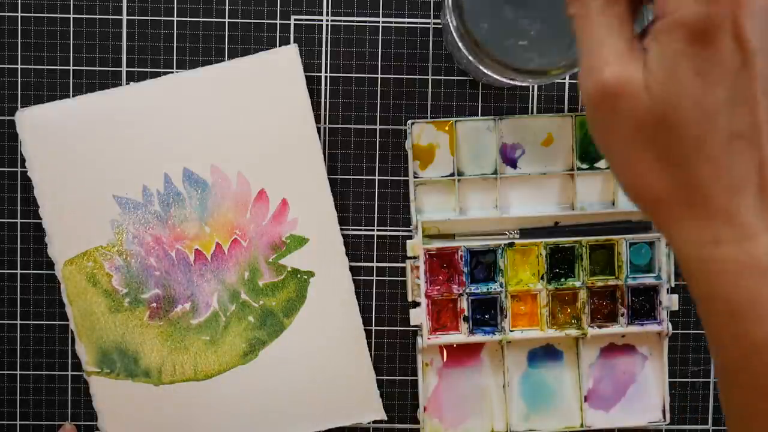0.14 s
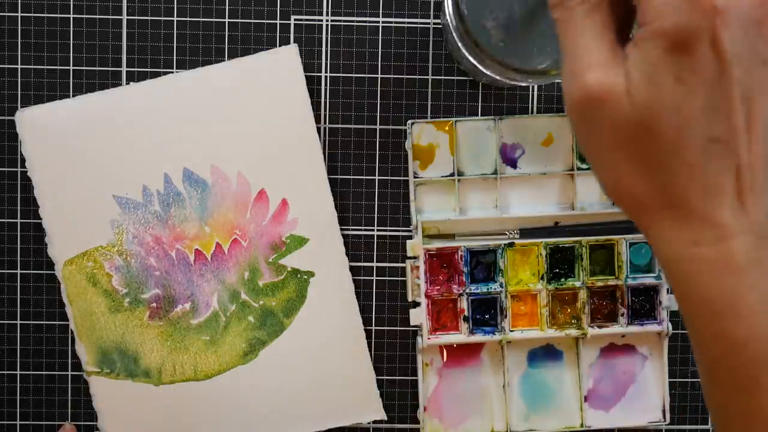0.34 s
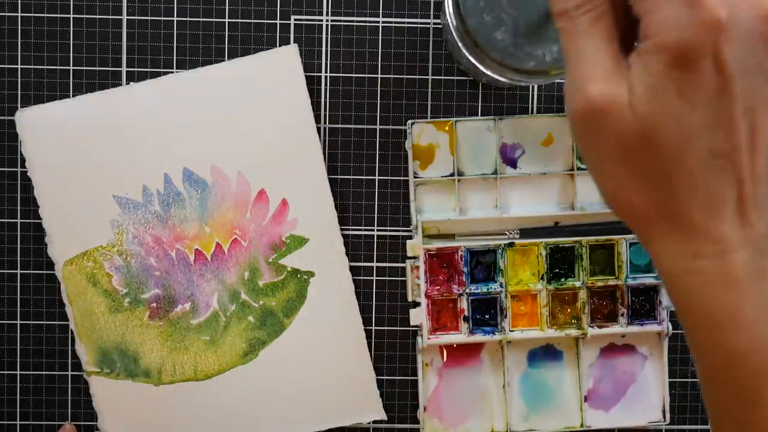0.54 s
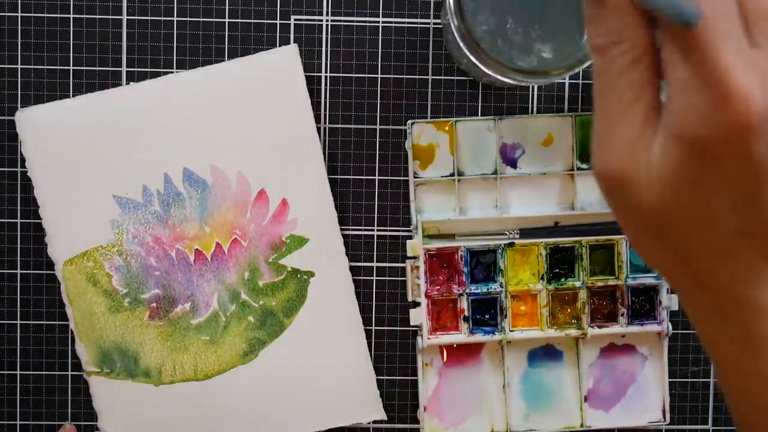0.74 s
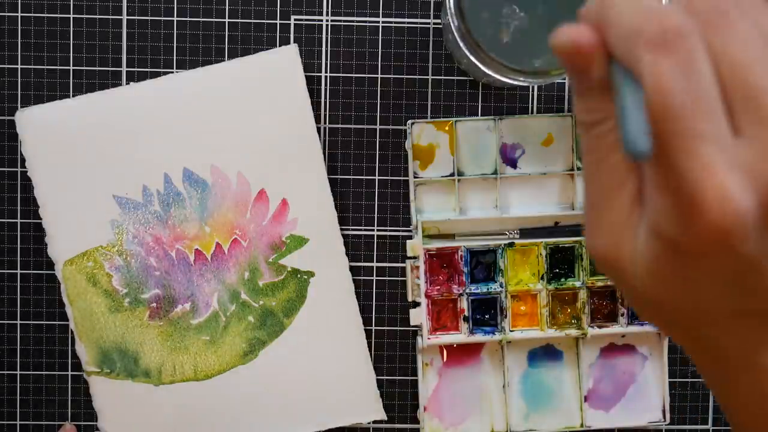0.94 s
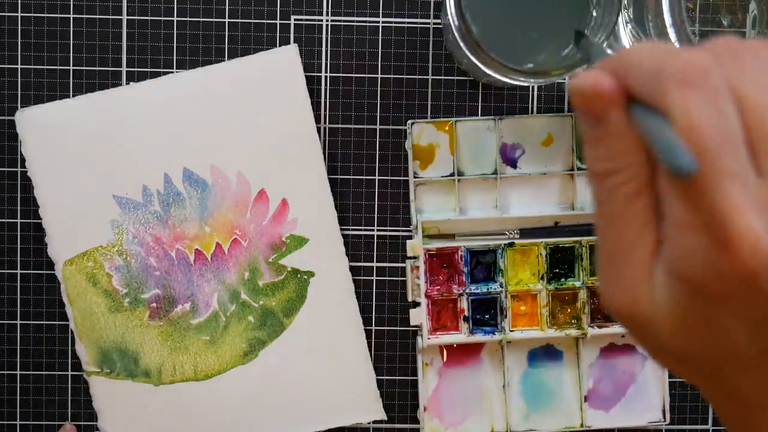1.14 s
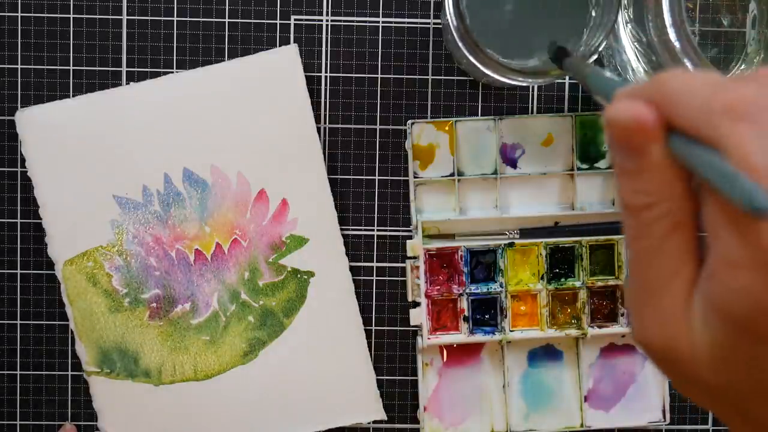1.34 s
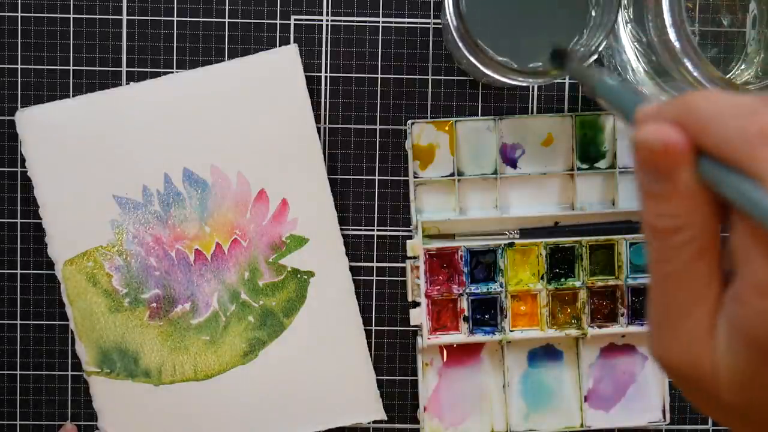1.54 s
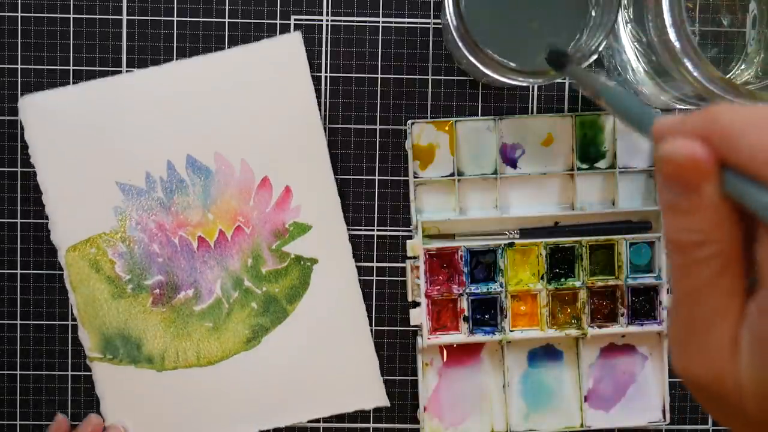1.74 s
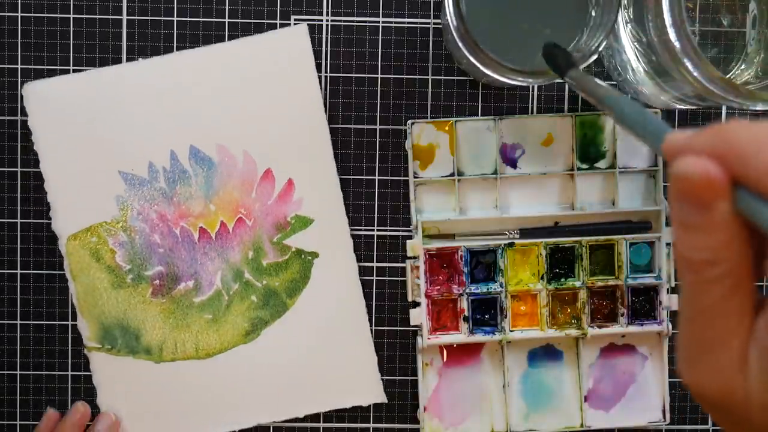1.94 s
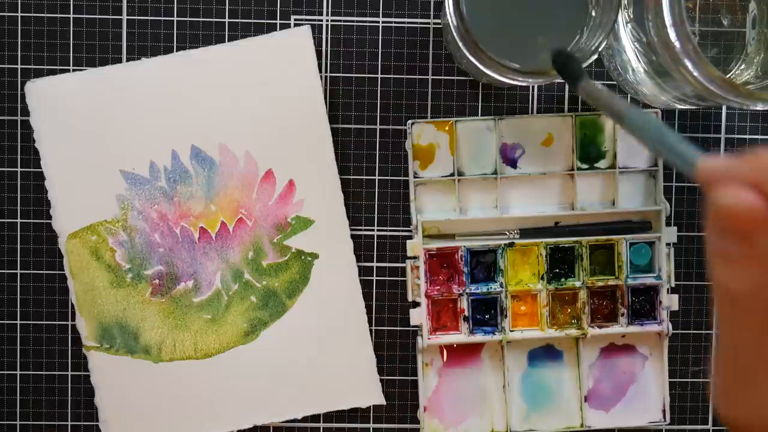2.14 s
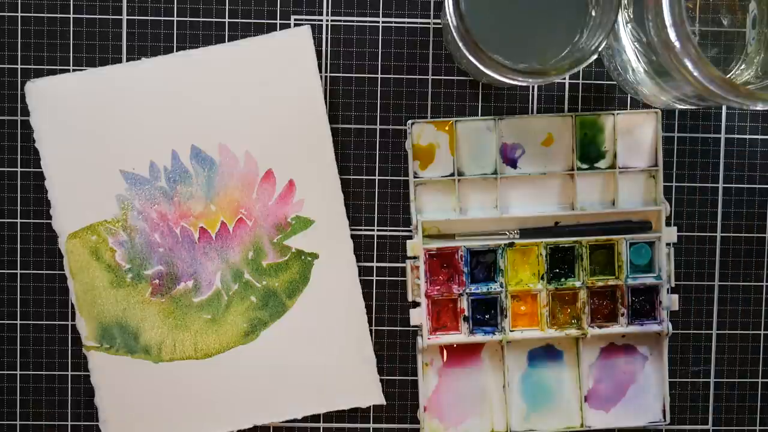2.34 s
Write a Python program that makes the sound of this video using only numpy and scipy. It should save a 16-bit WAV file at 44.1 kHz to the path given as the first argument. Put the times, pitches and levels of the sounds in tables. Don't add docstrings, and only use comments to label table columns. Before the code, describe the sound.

Brisk watery gurgles and glass clinks from a brush rinsed in a jar come first, then a single clink, soft dull double taps and faint papery brushing, heard close up in a quiet small room.

```python
import sys
import numpy as np
from scipy import signal
from scipy.fft import rfft, irfft
from scipy.io import wavfile
from scipy.ndimage import uniform_filter1d

SR = 44100
rng = np.random.default_rng(int(sys.argv[2]) if len(sys.argv) > 2 else 0)


def wrap_up_sound(samples):
    columns = np.atleast_2d(samples).T
    tamed = np.clip(columns, -1, 1)
    steps = np.round(tamed * 32767).astype(np.int16)
    wavfile.write(sys.argv[1], SR, steps)


def invert_db(x):
    u = np.asarray(x, float) / 20
    return 10 ** u


N = 105487
T = np.arange(N) / SR

# start in seconds, peak level in dB,
# brightness in dB per octave, level of the contact crack in dB, extra level of the high rim modes in dB.
GLASS_BLOWS = [(0.079, -34, 11, -23.5, -5), (0.153, -35.5, -4, -49.5, 2.5), (0.1595, -37.5, 1.5, -45, -2.5),
               (0.1856, -36, 0.5, -58, 3.5), (0.1901, -31.5, -1.5, -39.5, 0.5),
               (0.2453, -39, -3, -37.5, -9), (0.2589, -34, 1, -28, 1), (.3235, -32.5, -20, -61, -4),
               (.334, -37, -14, -70, 0.5), (.351, -40, -2, -53.5, -18), (0.3577, -33, 2.5, -29.5, 4),
               (0.432, -54, -0.5, -50, 4), (0.4502, -53, -0.5, -48.5, 0), (0.7787, -29.5, 0, -29.5, 5),
               (0.856, -42, -11, -54.5, 11)]


def in_time(rows):
    return np.interp(T, *np.transpose(rows))


def rms_one(x):
    return x / np.sqrt(np.mean(x ** 2) + 1e-20)


def wobble(size):
    once = uniform_filter1d(rng.standard_normal(N), size=size)
    return rms_one(uniform_filter1d(once, size=size))


def ring(clicks, hz, t60):
    radius = invert_db(-60 / (abs(t60) * SR))
    angle = 2 * np.pi * hz / SR
    return signal.lfilter([0, np.sin(angle)], [1, -2 * radius * np.cos(angle), radius * radius], clicks + 1e-18)


def clicks_at(s, db):
    out = np.zeros(N)
    np.add.at(out, (np.asarray(s) * SR).astype(int), invert_db(np.asarray(db)))
    return out


def filtered(x, order, hz, kind="low"):
    return signal.sosfilt(signal.butter(order, hz, kind, fs=SR, output="sos"), x)


def band(x, low_hz, high_hz):
    return filtered(x, 2, [low_hz, min(high_hz, .45 * SR)], "band")


def shaped(x, spectrum):
    hz, db = np.transpose(spectrum)
    f = np.maximum(np.arange(N // 2 + 1) * SR / N, 1)
    return irfft(rfft(x) * invert_db(np.interp(np.log(f), np.log(hz), db)), N)


def coloured(x, spectrum):
    return rms_one(shaped(x, spectrum))


def pair(side_db):
    mid, side = rng.standard_normal((2, N))
    return mid + shaped(side, side_db) * [[1], [-1]]


def crack(s, db, t60, low_hz, high_hz):
    puff = signal.lfilter([1], [1, -invert_db(-60 / (abs(t60) * SR))], clicks_at(s, db) + 1e-18)
    return band(puff * rng.standard_normal(N), low_hz, high_hz)


def bubble(s, db, hz, t60, glide, rise_s):
    t = np.maximum(T - s, 0)
    bend = glide * (t - t60 * (1 - np.exp(-t / t60)))
    envelope = invert_db(db - 60 * t / t60) * (1 - np.exp(-t / rise_s))
    return envelope * np.sin(2 * np.pi * hz * (t + 2 * bend))


def air():
    # frequency in Hz, density in dB per Hz.
    tone_spectrum = [(15, -50.5), (25, -9.5), (310, 1), (519, -1), (595, -3), (1620, -5), (1760, -6.5),
                     (14900, -14.5), (16200, -20.5)]
    # frequency in Hz, level in dB.
    tone_side = [(60, 10.5), (240, 10.5), (950, 9), (3770, -2), (15000, -5)]
    # frequency in Hz, level in dB.
    hum_lines = [
        (120, -77.5),
        (240, -74.5),
    ]
    hum = sum(invert_db(db) * np.sin(2 * np.pi * hz * T) for hz, db in hum_lines)
    return invert_db(-59.5) * coloured(pair(tone_side), tone_spectrum) + hum


def gurgles():
    # time in seconds, level in dB.
    vigour = [
        (.055, -93.5),
        (.07, -33),
        (.13, -50),
        (.2, -43.5),
        (.3, -53),
        (.4, -52),
        (.46, -68),
        (.55, -71),
        (.62, -106),
    ]
    rate_per_s, cycles, voices = 570, 22, 14
    strength = invert_db(2.8 * np.minimum(rng.exponential(1, N), 4)) * rng.choice([-1, 1], N)
    starts = strength * (rng.random(N) < rate_per_s / SR)
    voice = rng.integers(0, voices, N)
    pitches_hz = np.geomspace(1010, 2500, voices)
    bed = sum(ring(starts * (voice == k), hz, cycles / hz) for k, hz in enumerate(pitches_hz))
    fizz = rms_one(band(rng.standard_normal(N), 3000, 10000) * invert_db(4.5 * wobble(size=90)))
    return invert_db(in_time(vigour)) * (rms_one(band(bed, 550, 2500)) + invert_db(-12) * fizz)


def water():
    # start in seconds, peak level in dB, pitch in Hz,
    # decay time t60 in seconds, glide as a share of pitch.
    plop_rows = [(0.0639, -37, 1050, 0.043, 0.00084), (.103, -43.5, 2170, 0.11, -0.024),
                 (0.325, -37, 1136, 0.063, -0.059), (0.5174, -40, 2450, 0.0089, .05),
                 (.5245, -41, 2086, 0.04, 0.042), (0.5214, -42.5, 1202, 0.066, 0.081),
                 (.538, -33.5, 1540, 0.02, 0.054), (0.856, -49.5, 1790, 0.013, .03),
                 (0.3596, -26.5, 1190, 0.02, 0.0028), (.0685, -23, 2230, 0.0079, 0.082),
                 (.0790, -1.5, 1887, 0.0064, 0.14), (.082, -27, 1035, 0.081, -0.014),
                 (0.1536, -37.5, 2500, 0.012, 0.24), (0.1787, -27, 1082, 0.045, 0.054),
                 (0.1778, -18, 1554, 0.012, -0.061), (.190, -22.5, 1102, 0.03, 0.31),
                 (0.206, -25, 1333, 0.009, 0.26), (0.2596, -4.5, 1650, 0.0096, 0.31),
                 (0.3225, -23, 1581, 0.014, .05), (0.359, -5.5, 1600, 0.012, -0.18),
                 (.3655, -21, 1376, 0.044, 0.12), (0.37, -22.5, 1564, 0.026, .1),
                 (.391, -49.5, 1457, .03, -0.042), (.795, -45.5, 960, 0.094, 0.016),
                 (0.3593, -25.5, 1180, 0.054, .01), (0.3998, -49.5, 1263, 0.025, .05),
                 (0.5206, -21, 1970, 0.01, 0.15), (.529, -27, 1560, 0.022, 0.12),
                 (.792, -17.5, 1035, 0.0043, 0.0045), (0.778, -24, 1630, 0.0095, -0.085)]
    # start in seconds, peak level in dB, pitch in Hz, t60 in seconds.
    drop_rows = [(.0434, -39, 3210, .025), (.0431, -39.5, 5970, 0.0485), (.0432, -49, 9750, .07),
                 (.0693, -32, 5600, .011), (.1825, -34.5, 4200, 0.012), (.1906, -27.5, 4560, 0.015),
                 (.2291, -46.5, 5400, .045), (.0722, -38.5, 3440, 0.016), (.0656, -47, 7290, .028),
                 (.7791, -39.5, 3390, 0.025), (.7912, -50.5, 3890, 0.0306), (.3236, -42.5, 3900, .015),
                 (.5304, -31.5, 4950, 0.0069), (.5308, -29.5, 6800, 0.0048), (.5309, -37, 10100, 0.0048),
                 (.5422, -39, 4650, 0.018), (.6036, -43.5, 6350, 0.021), (0.69, -36, 10830, 0.0063),
                 (.6154, -35, 14600, .004), (1.7645, -47.5, 2400, .011), (2.0005, -64, 8500, .08)]
    # start in seconds, peak level in dB, pitch in Hz, t60 in seconds.
    glug_rows = [(.1595, -15, 2020, .015), (.2435, -13, 1860, .014), (.3425, -16, 1600, 0.025),
                 (.189, -20, 1060, 0.043), (.418, -31.5, 1470, 0.083), (.085, -44.5, 680, 0.052),
                 (.21, -41.5, 650, .05), (.238, -41, 655, 0.1), (.268, -43.5, 682.5, 0.058),
                 (1.795, -53, 430, .04)]
    plops = sum(bubble(*row, rise_s=0.0004) for row in plop_rows) * invert_db(1.5 * wobble(size=40))
    drops = sum(bubble(*row, glide=0.012, rise_s=0.00017) for row in drop_rows)
    drops = drops * invert_db(4 * wobble(size=14))
    quick = filtered(plops + drops + gurgles(), 6, 960, "high")
    return quick + sum(bubble(*row, glide=0.033, rise_s=.004) for row in glug_rows)


def ticks():
    # start in seconds, peak level in dB, centre frequency in Hz.
    flicks = [(0.065, -48, 10100), (0.227, -38, 5050), (.2322, -41, 5150), (.7932, -46, 7100),
              (.8032, -49, 9900), (.5056, -46, 10500), (.5176, -46, 6700), (0.544, -44, 7400),
              (0.5965, -57, 13500), (.6096, -54, 4600), (.6262, -56, 11100), (0.6363, -46, 10100),
              (.8682, -50, 9700), (0.894, -55.5, 7400), (.9122, -58, 10100), (1.1063, -47, 10100),
              (2.0006, -58, 8700)]
    return sum(crack([s], [db], t60=0.0105, low_hz=hz * 0.64, high_hz=hz * 1.28) for s, db, hz in flicks)


def glass():
    # frequency in Hz, level in dB, t60 in seconds.
    jar_modes = [(2533.9, -8, 0.16), (2710, 4.5, 0.0058), (5975, -15.5, 0.082), (6140, -5.5, .02),
                 (8583, -14, 0.08), (8550, -9.5, 0.013), (9410, -22, 0.04), (9970, -19.5, 0.038),
                 (10500, -23, 0.031), (10930, -20.5, 0.036)]
    contact_s, rim_hz, submerged_until_s, submerged_damping = 0.00024, 7500, .6, .6
    s, db, tilt, crack_db, rim_db = np.transpose(GLASS_BLOWS)
    wet = T < submerged_until_s
    out = crack(s, crack_db, t60=0.019, low_hz=4780, high_hz=10500)
    spray = crack(s, crack_db - 13.5, t60=.13, low_hz=5430, high_hz=10900)
    out = out + spray * invert_db(3.0 * wobble(size=60))
    for hz, mode_db, t60 in jar_modes:
        octaves = np.log2(hz / jar_modes[0][0])
        blow_db = db + mode_db + rim_db * (hz > rim_hz) + tilt * octaves
        push = ring(clicks_at(s, blow_db), hz, np.log(1000) * contact_s) * 2 / (contact_s * SR)
        tone = ring(push * wet, hz, t60 * submerged_damping) + ring(push * ~wet, hz, t60)
        out = out + tone * invert_db(3.5 * wobble(size=150))
    return out


def knocks():
    s, _, _, crack_db, _ = np.transpose(GLASS_BLOWS)
    return crack(s, crack_db - 4.5, t60=0.23, low_hz=160.0, high_hz=655)


def table():
    # start in seconds, peak level in dB.
    shoves = [(0.079, -34.5), (0.181, -43.5), (0.224, -54), (0.259, -34), (.325, -53), (0.372, -48),
              (0.445, -43), (0.553, -54), (0.791, -50.5), (1.191, -45.5), (1.795, -51), (2.174, -50.5)]
    push = clicks_at(*np.transpose(shoves))
    murmur = rms_one(ring(rng.standard_normal(N), hz=149.2, t60=0.073))
    main = ring(ring(push, 146.2, 0.12), 146.2, 0.092) / 250
    upper = invert_db(-8) * ring(push, hz=228, t60=0.087)
    hand = bubble(.556, -50.5, 71.4, 0.11, glide=-.1, rise_s=0.0074)
    return main + upper + hand + invert_db(-74) * murmur


def taps():
    # start in seconds, peak level in dB, crack level in dB, thud level in dB.
    tap_rows = [(1.042, -51, -70.5, -59.5), (1.072, -37.5, -53.5, -55), (1.181, -36, -50, -59.5),
                (1.298, -36, -65, -56), (1.323, -33.5, -46, -59.5), (1.368, -47.5, -68, -57.5),
                (1.397, -36, -49.5, -59.5), (1.521, -41.5, -67, -54.5), (1.547, -34, -46, -57),
                (1.619, -39, -53, -62), (1.72, -49, -61.5, -67), (1.75, -40, -56, -82),
                (1.847, -43, -69, -63.5), (1.914, -49, -72, -71), (1.946, -43, -64, -61),
                (2.031, -42, -57, -59), (2.102, -48, -68, -61), (2.13, -37.5, -54.5, -56.5)]
    knock_t60_s, vary_db, thud_hz = .0095, 2, 240.3
    s, db, crack_db, thud_db = np.transpose(tap_rows)
    upper_vary, lower_vary = vary_db * rng.standard_normal((2, len(s)))
    soft = band(clicks_at(s, db + 3), 810, 3470)
    upper = band(clicks_at(s, db + 3 + upper_vary), 810, 3470)
    lower = band(clicks_at(s, db + 3 + lower_vary), 810, 3470)
    knock = ring(soft, 1417, knock_t60_s)
    knock = knock + invert_db(-16.5) * ring(upper, 1836, knock_t60_s)
    knock = knock + invert_db(-6.5) * ring(lower, 1090, 1.2 * knock_t60_s)
    tick = crack(s, 1.37 * crack_db + 26.5, t60=0.013, low_hz=2535, high_hz=8600)
    thud = ring(ring(clicks_at(s, thud_db - 4.5), thud_hz, 0.036), thud_hz, 0.13) / 40
    body = crack(s, db - 8, t60=0.27, low_hz=272, high_hz=920)
    return knock + tick + thud + body


def wipes():
    # start in seconds, length in seconds, level in dB, attack in seconds.
    strokes = [
        (1.745, 0.086, -51.5, 0.0043),
        (2.038, 0.18, -54.5, 0.095),
        (2.29, 0.031, -69, 0.0195),
    ]
    # frequency in Hz, density in dB per Hz.
    hiss_spectrum = [(120, -19), (200, 4), (448, 2), (538, -7), (1060, -0.5), (1740, -2.5), (8740, -8),
                     (14900, -22), (16000, -54)]
    # frequency in Hz, level in dB.
    hiss_side = [(60, -10), (380, -5), (2380, -10), (15000, -8)]
    # frequency in Hz, width in Hz, level in dB.
    paper_modes = [(3240, 430, -4), (5340, 880, -9), (9170, 1200, -18)]
    fade_db_per_s, release_s = 23, 0.049
    shape = 0
    for s, hold, db, rise in strokes:
        sag = invert_db(db - fade_db_per_s * np.clip(T - s, 0, hold))
        attack = np.clip((T - s) / rise, 0, 1) ** 2
        release = np.exp(-np.maximum(T - s - hold, 0) / release_s)
        shape = shape + sag * attack * release
    hiss = coloured(pair(hiss_side), hiss_spectrum)
    hiss = hiss + sum(invert_db(db) * band(hiss, hz - width / 2, hz + width / 2) for hz, width, db in paper_modes)
    return shape * invert_db(1.9 * wobble(size=60)) * hiss


def room(x):
    # frequency in Hz, level in dB.
    echo_side = [(200, 4.5), (600, -0.5), (1200, -7), (4000, -7.5), (8000, -6), (13000, 2.5)]
    split_hz, cut_hz, gap_s = 2640, 13200, 0.00087
    noise = pair(echo_side)
    low = filtered(noise, 4, split_hz) * invert_db(-60 * T / 0.2)
    high = filtered(noise, 4, split_hz, "high") * invert_db(2.4 - 60 * T / 0.16)
    echo = (low + high) * (T > gap_s)
    echo = signal.lfilter([1], [1, -np.exp(-2 * np.pi * cut_hz / SR)], echo)[:, :SR // 2]
    echo = echo / np.sqrt(np.sum(echo ** 2) / 2)
    return invert_db(-4) * signal.fftconvolve(x[None], echo, axes=1)[:, :N]


def scene():
    near = water() + ticks() + glass() + taps() + knocks()
    pan_db = -0.8
    direct = near * invert_db(np.array([[pan_db], [-pan_db]]))
    return direct + room(near) + table() + wipes() + air()


def roll_off(x):
    return signal.sosfilt(signal.butter(12, 16520, fs=SR, output="sos"), x)


def record(dry):
    notch_hz, notch_width_hz, notch_share = 7770, 300, 0.94
    b, a = signal.iirnotch(notch_hz, notch_hz / notch_width_hz, SR)
    x = (1 - notch_share) * dry + notch_share * signal.lfilter(b, a, dry)
    x = filtered(x, 6, 14750)
    x = filtered(x, 2, 55.5, "high")
    return roll_off(x)


dry = scene()
out = record(dry)
wrap_up_sound(out)
```